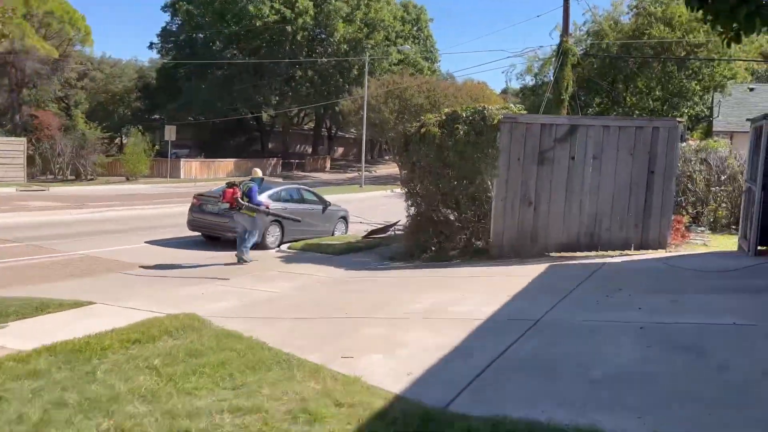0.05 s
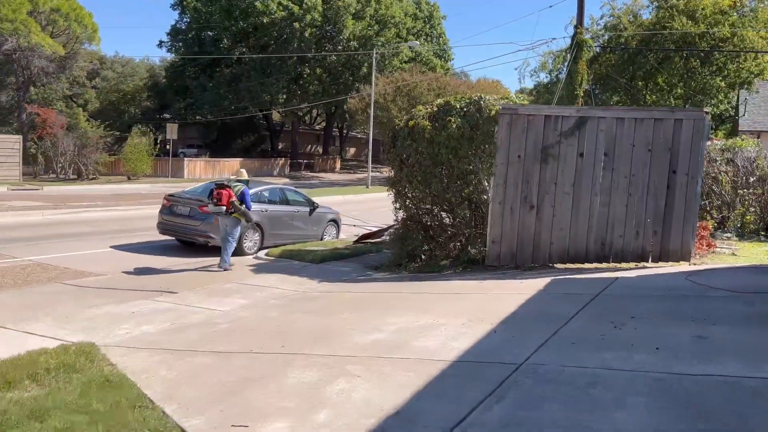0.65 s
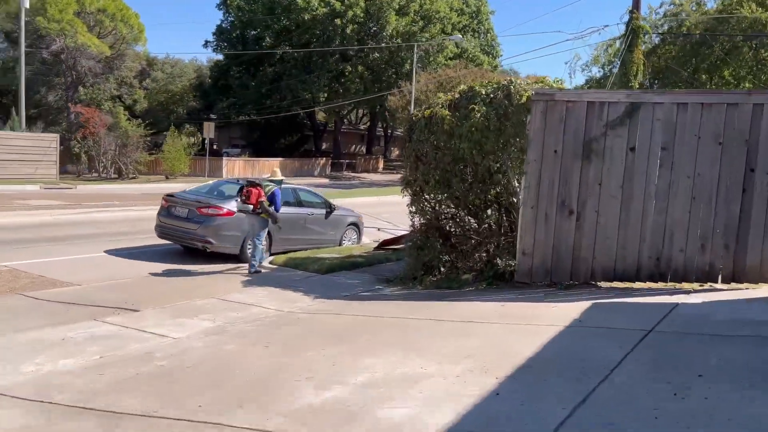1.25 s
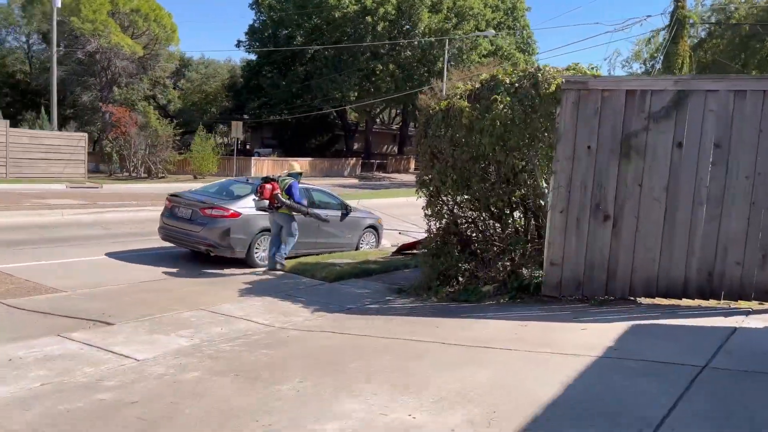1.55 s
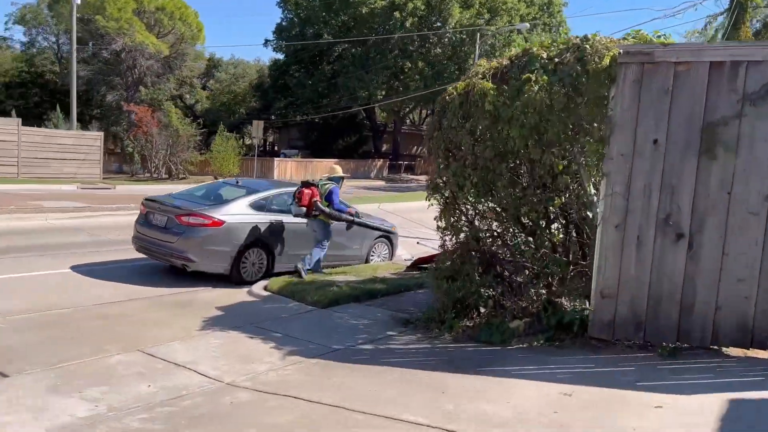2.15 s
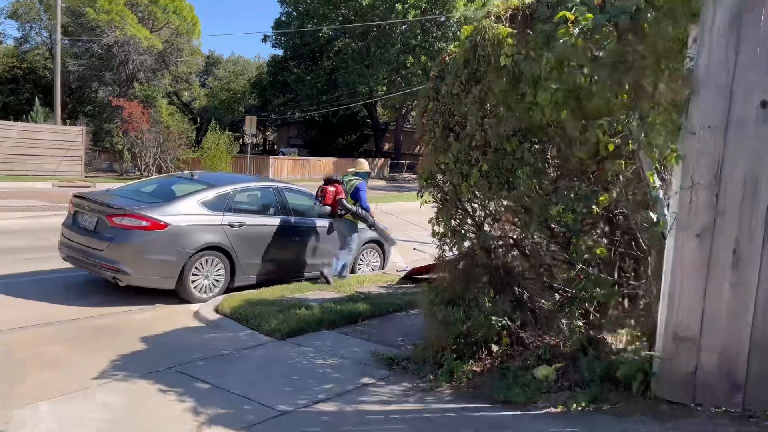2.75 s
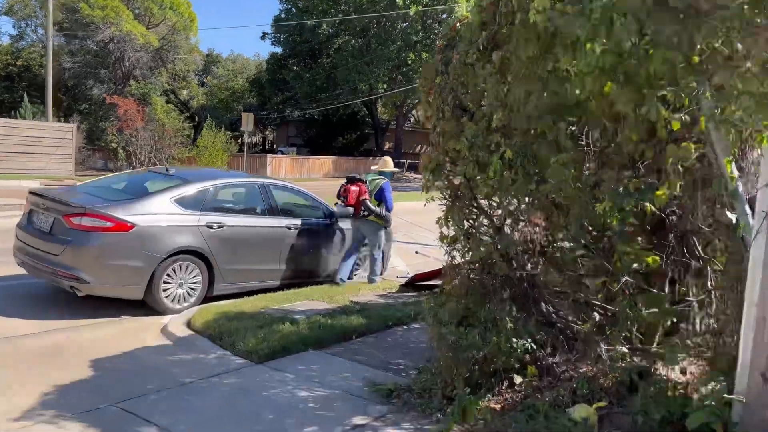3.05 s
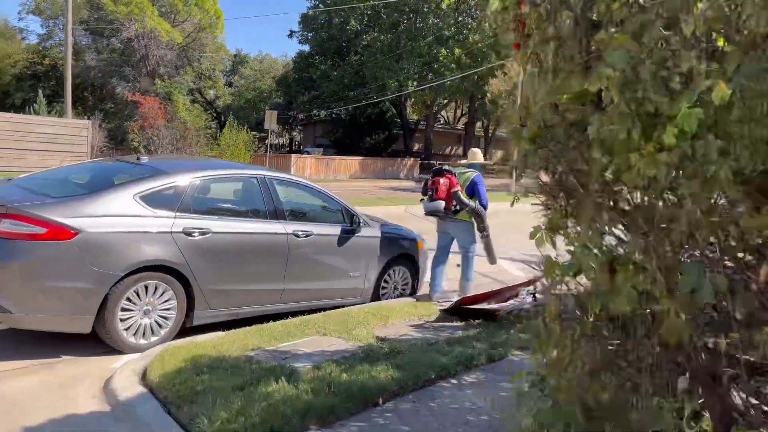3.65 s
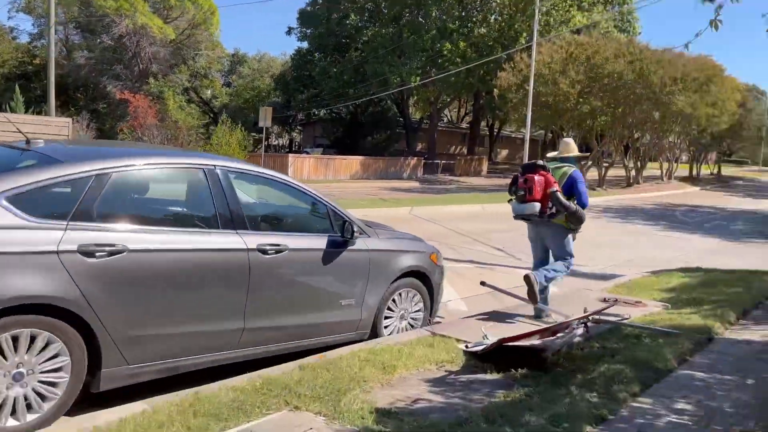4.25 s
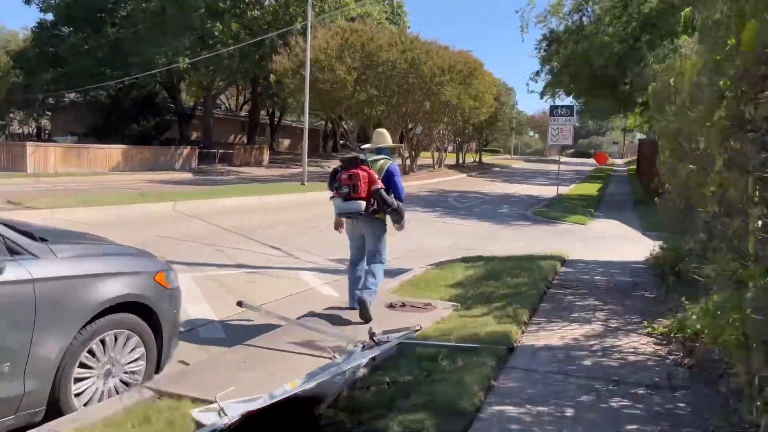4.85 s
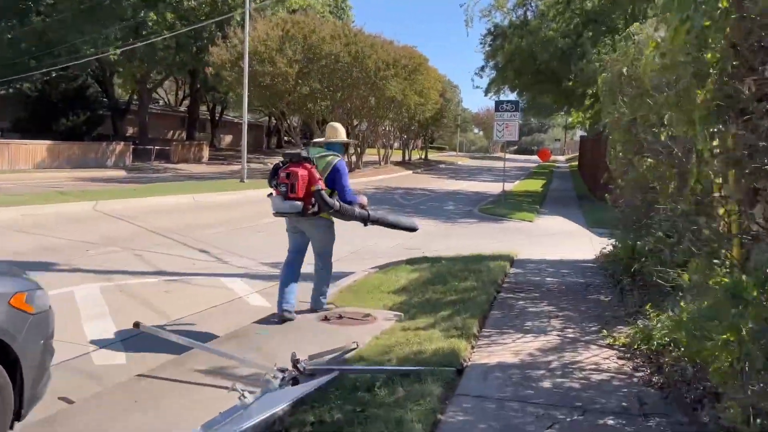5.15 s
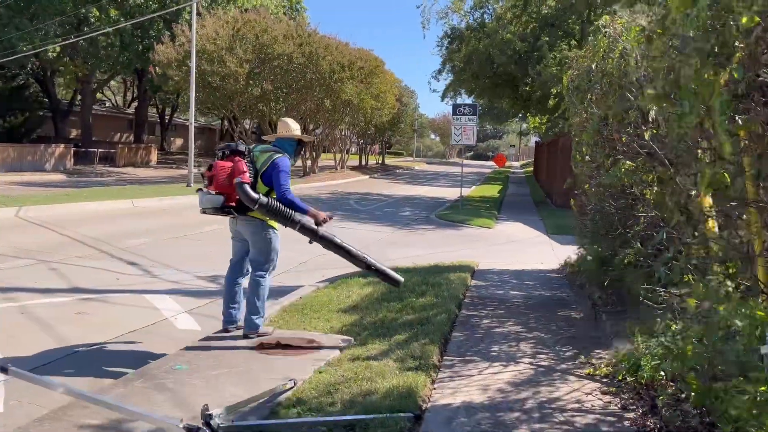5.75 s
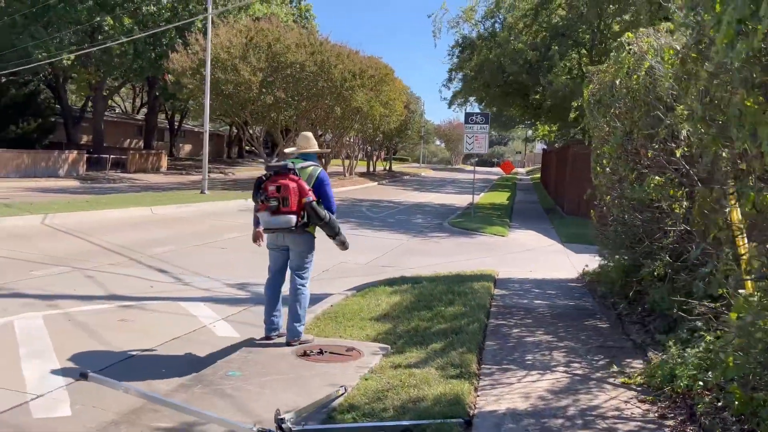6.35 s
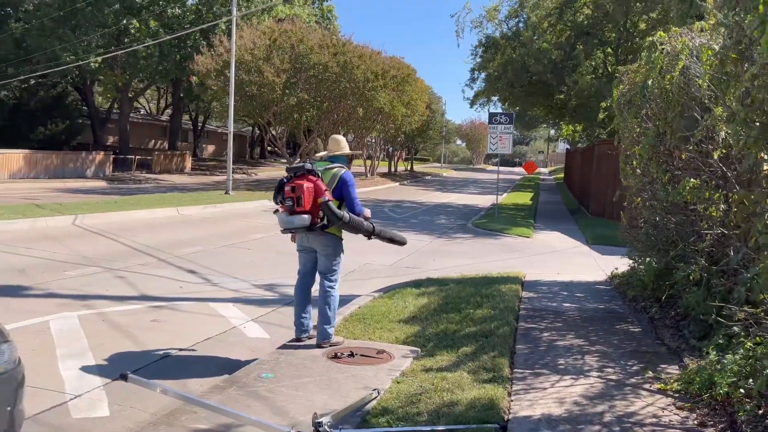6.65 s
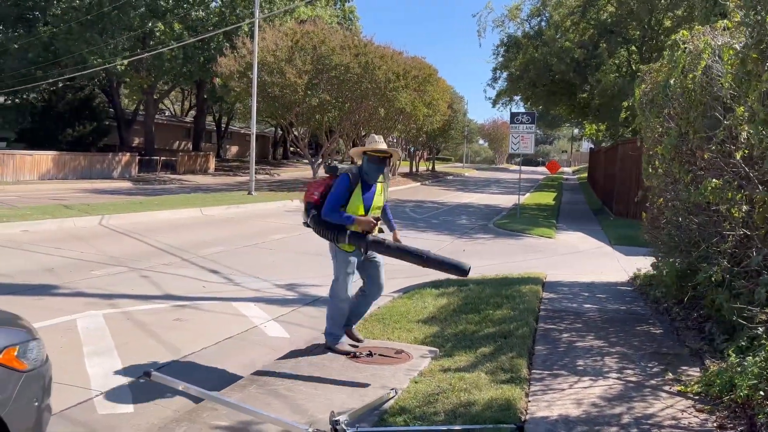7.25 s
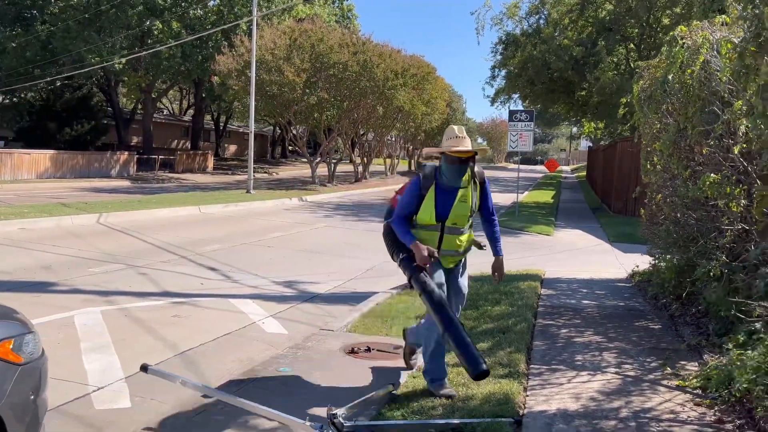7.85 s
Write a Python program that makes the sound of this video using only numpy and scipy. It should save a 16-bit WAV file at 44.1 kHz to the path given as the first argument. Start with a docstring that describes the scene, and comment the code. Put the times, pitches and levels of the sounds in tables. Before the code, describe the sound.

A two-stroke leaf blower runs flat out with a buzzing whine and rushing air, then coasts down while another engine revs farther off.

```python
"""Leaf blower beside a street

A two-stroke backpack leaf blower runs flat out while the microphone walks up to it. Its exhaust
drones, its fan whines and its air jet hisses over the pavement; at 7 s the throttle is let go and
it coasts down. A second machine further off idles, then revs up once and drops back.
The street rumbles underneath, and distant motors hum at the start."""
import sys
import numpy as np
from scipy import signal
from scipy.fft import rfft, irfft, next_fast_len
from scipy.io import wavfile
from scipy.ndimage import uniform_filter1d, map_coordinates

SR = 44100
rng = np.random.default_rng(int(sys.argv[2]) if len(sys.argv) > 2 else 0)


def pcm_store(signal):
    """Save signal as 16-bit PCM."""
    levels = np.round(np.clip(np.atleast_2d(signal), -1, 1) * 32767)
    wavfile.write(sys.argv[1], SR, levels.astype(np.int16).T)


N = 348390
TIME = np.arange(N) / SR


def amp(db):
    """Turn decibels into a gain."""
    return 10 ** (np.asarray(db) / 20)


def unit(x):
    """Scale a signal to an average (rms) level of 1."""
    return x / np.sqrt(np.mean(x ** 2) + 1e-20)


def since(start_s):
    """Seconds gone by since the start, zero before it."""
    return np.maximum(TIME - start_s, 0)


def bell(x, centre, width):
    """A smooth hump that reaches 1 at its centre."""
    return np.exp(-((x - centre) / width) ** 2)


def along(points, hz):
    """Read between (frequency, value) points on a musical (log) scale."""
    point_hz, values = np.transpose(points)
    return np.interp(np.log(hz + 1), np.log(point_hz + 1), values)


def curves(rows):
    """Join a table's rows with straight lines: one curve for each column after the time."""
    times, *columns = np.transpose(rows)
    return [np.interp(TIME, times, column) for column in columns]


def wobble(rate):
    """A smooth random curve through `rate` new values a second."""
    coarse = np.arange(0, N + 64, 64)
    knots = rng.standard_normal(4096)
    return np.interp(np.arange(N), coarse, map_coordinates(knots, [coarse * rate / SR], mode="wrap"))


def filtered(x, response):
    """Multiply each frequency in x by response(hz)."""
    size = next_fast_len(N + SR // 4)
    return irfft(rfft(x, size) * response(np.fft.rfftfreq(size, 1 / SR)), size)[..., :N]


def lows(x, split_hz):
    """Keep the part of x below split_hz."""
    return filtered(x, lambda hz: 1 / (1 + (hz / split_hz) ** 6))


def rush(spectrum, patchy_db, frames=40):
    """Swirling air, direct and scattered: noise with loud and soft patches, each `frames` long."""
    noise = signal.stft(rng.standard_normal((2, N)), nperseg=512)[2]
    patches = uniform_filter1d(rng.standard_normal(noise.shape[1:]), size=6, axis=0)
    patches = uniform_filter1d(patches, size=frames, axis=1)
    pair = signal.istft(noise * amp(patchy_db * unit(patches)), nperseg=512)[1][:, :N]
    return unit(filtered(pair, lambda hz: amp(along(spectrum, hz))))


def shaft(hz, jitter):
    """The angle of a turning shaft: no two firings push quite alike."""
    return 2 * np.pi * np.cumsum(hz * (1 + jitter * wobble(70))) / SR


def tone(angle, scatter, rate, spread=1, in_step=False):
    """A tone, direct and scattered, that shimmers as reflections shift."""
    # tones in step peak near each firing, so together they buzz
    offset = rng.normal(0, 1.1) if in_step else rng.uniform(0, 2 * np.pi)
    angle = (angle % (2 * np.pi) + offset).astype(np.float32)
    cos, sin = np.cos(angle), np.sin(angle)
    a, b = wobble(rate), wobble(rate)
    direct = (np.sqrt(2) * cos + scatter * (a * cos + b * sin)) / np.sqrt(1 + scatter ** 2)
    return np.array([direct, spread * (b * cos - a * sin)])


# Far-off hums: (pitch [Hz], level [dB], middle of the fade-out [s])
MOTOR_HUMS = [(223.6, -59.5, 4.16), (319, -62, 1.98), (400, -52, 0.83), (531, -58, 1.06), (591, -50, 0.66),
              (696.5, -49.5, 0.94)]


def distant_motors():
    """Each motor hums one wavering note, then fades away."""
    hum = 0
    for hz, db, fade_s in MOTOR_HUMS:
        fade = np.clip((fade_s - TIME) / 0.49 + .5, 0, 1)
        angle = shaft(hz * (1 + 0.00457 * wobble(5.45)), jitter=0.0071)
        hum += amp(db) * fade * tone(angle, scatter=1.0, rate=18)
    return hum


# Tone colour of the street: (frequency [Hz], relative level [dB])
RUMBLE_COLOUR = [(25, -34), (45, -57), (70, -16.5), (105, -1.5), (160, 0.5), (230, 1), (330, -2.5),
                 (480, -3.5), (650, -9), (1000, -5), (2000, -89)]
# How it rises and falls: (time [s], relative bass level [dB], relative low-mid level [dB])
RUMBLE_LEVELS = [(0.0, -54, -56), (0.63, -58, -56), (0.81, -50.5, -51.5), (1.08, -62, -56),
                 (1.38, -55.5, -53.5), (1.77, -70, -56), (1.89, -60, -56), (2.28, -65.5, -55),
                 (3.81, -65.5, -59.5), (4.05, -54.5, -58), (4.95, -68, -57.5), (5.28, -55.5, -58),
                 (5.58, -62, -61), (6.95, -71.5, -59.5)]


def street_rumble():
    """Low outdoor noise; faint footsteps thud in its deepest part now and then."""
    bass_db, low_mid_db = curves(RUMBLE_LEVELS)
    rumble = rush(RUMBLE_COLOUR, patchy_db=2.5)
    bass = lows(rumble, split_hz=194)
    return amp(bass_db + 8.5 + 2.5 * wobble(8.3)) * bass + amp(low_mid_db + 5.5) * (rumble - bass)


# Both machines share an idle speed, a note at which the fan housing rings, and ragged firing off load.
IDLE_HZ, COAST_S = 107.7, .225
HOUSING_HZ, HOUSING_WIDTH_HZ = 2170, 270
MISFIRE_DB = 2.2


def coast(hz, shut_s):
    """Shaft speed that runs down to idle once the throttle shuts."""
    return IDLE_HZ + (hz - IDLE_HZ) * np.exp(-since(shut_s) / COAST_S)


REV_OPEN_S, REV_SHUT_S, REV_RISE_S, REV_TOP_HZ = 7.09, 7.725, 0.23, 234.5


def rev_speed():
    """The second machine's speed: idle, a run-up that levels off, then coasting."""
    opened = 1 - np.exp(-(since(REV_OPEN_S) / REV_RISE_S) ** 1.4)
    return coast(IDLE_HZ + (REV_TOP_HZ - IDLE_HZ) * opened, REV_SHUT_S)


def second_exhaust(angle, hz, load):
    """The pipe booms and the muffler rings as the rising tones pass through their natural notes."""
    boom = amp(6.4 * load * bell(hz, 169.4, 8.9))
    low_ring = amp(-5 + 5.8 * load * bell(2 * hz, 350, 70))
    high_ring = amp(-5.5) * bell(3 * hz, 560, 30)
    return (boom * tone(angle, scatter=0.53, rate=34, spread=0.23)
            + low_ring * tone(2 * angle, scatter=0.35, rate=13, spread=0.59)
            + high_ring * tone(3 * angle, scatter=0.33, rate=11, spread=0.45))


# The second machine's buzz: (multiple of the shaft speed, relative level [dB])
SECOND_BUZZ = [(3, -6), (4, -2), (5, -1), (6, -9), (7, 0), (8, -9), (9, -10), (10, -8), (11, -10)]
# Tone colour of its sputter: (frequency [Hz], relative level [dB])
SPUTTER_COLOUR = [(40, -70), (90, -31), (140, 4), (210, 1), (300, -9), (400, -12), (560, -7), (900, -11),
                  (1500, -35), (4000, -80)]


def second_machine():
    """Another two-stroke idles, opens up for about half a second and falls back sputtering."""
    hz = rev_speed()
    speed_db = 20 * np.log10(hz / REV_TOP_HZ)
    unloaded = 1 - np.exp(-since(REV_SHUT_S) / .06)
    load = np.clip(since(REV_OPEN_S) / .08, 0, 1) * (1 - unloaded)
    ragged_db = (2 + MISFIRE_DB * unloaded) * wobble(45)
    angle = shaft(hz, jitter=0.0045 + 0.0208 * unloaded)
    exhaust_db = -43.5 + 1.36 * speed_db - 21 * (1 - load) + ragged_db
    exhaust = amp(exhaust_db) * second_exhaust(angle, hz, load)
    buzz = sum(amp(db) * tone(k * angle, scatter=.7, rate=20) for k, db in SECOND_BUZZ)
    # the fan's whine flares where its housing rings
    flare = (TIME <= REV_SHUT_S) * bell(12 * hz, 2715, 80)
    flare += 0.5 * unloaded * bell(12 * hz, HOUSING_HZ, HOUSING_WIDTH_HZ)
    whine_db = -60.5 + speed_db + 9 * flare - 3 * unloaded + 2.1 * wobble(45)
    whine = amp(whine_db) * tone(12 * angle, scatter=0.57, rate=35, spread=0.9)
    whine *= np.clip(since(REV_OPEN_S) / REV_RISE_S, 0, 1)
    puffs = np.exp(0.97 * np.cos(angle)) * amp(MISFIRE_DB * wobble(50)) * rng.standard_normal((2, N))
    sputter = amp(-51) * unloaded * unit(filtered(puffs, lambda hz: amp(along(SPUTTER_COLOUR, hz))))
    buzz_db = -54 + 5 * speed_db - 3 * unloaded + 1.25 * wobble(30)
    return exhaust + amp(buzz_db) * buzz + whine + sputter


# The echo off the pavement comes later as the microphone nears: (time [s], delay [ms])
ECHO_DELAY = [(0.0, 0.39), (1.0, 0.35), (1.7, 0.44), (2.3, 0.55), (2.9, 0.61), (4.2, 0.71), (5.0, 0.81),
              (5.7, 0.88), (7.0, 0.88)]


def pavement(x, share):
    """The ground's echo cuts hollows into the air noise, and they slide down in pitch."""
    delay_ms, = curves(ECHO_DELAY)
    echo = np.array([np.interp(TIME - delay_ms / 1000, TIME, row) for row in x])
    return (x + share * echo) / np.sqrt(1 + share ** 2)


# Tone colours of the jet and of its hollow puff: (frequency [Hz], relative level [dB])
JET_COLOUR = [(300, -32), (600, -20.5), (850, -4), (1100, 6), (1350, 1), (1700, -11), (3000, -26)]
PUFF_COLOUR = [(550, -25), (950, 0), (1500, -22), (4000, -60)]


def ground_jet(gain, sweep):
    """The air jet hits the ground, and puffs as the nozzle sweeps over it."""
    gust = pavement(rush(JET_COLOUR, patchy_db=1.3, frames=20), share=0.19)
    lower = lows(gust, split_hz=1300)
    tilt_db = -1.8 + 0.19 * TIME  # the ground's echo brightens the jet as the microphone nears
    jet = amp(tilt_db) * (gust - lower) + amp(-tilt_db) * lower
    return gain * jet + amp(-46) * sweep * rush(PUFF_COLOUR, patchy_db=5)


# The air's middle range at full throttle: (time [s], relative jet level [dB], relative roar level [dB])
AIR_MID_LEVELS = [(0.0, -51, -47), (0.45, -46.5, -41.5), (0.6, -48.5, -45.5), (1.14, -48.5, -45.5),
                  (1.26, -54, -45.4), (1.5, -49, -45.5), (1.68, -51, -45.5), (2.04, -46, -45),
                  (2.37, -57, -43.5), (2.7, -48, -44), (2.94, -50.5, -44), (3.21, -55, -45.5),
                  (4.05, -49.5, -46), (4.32, -54, -44), (4.98, -45, -45.5), (5.25, -46.5, -44.5),
                  (5.4, -46, -42.5), (6.42, -45.5, -45), (6.78, -48, -48), (6.95, -44.5, -45.5)]
# Its treble: (time [s], relative hiss level [dB], relative fizz level [dB])
AIR_TREBLE_LEVELS = [(0.0, -44, -50), (0.5, -44.5, -49.5), (0.8, -43, -53.5), (1.8, -45, -48.5),
                     (2.1, -45, -51), (2.8, -43, -49.5), (3.4, -48, -55), (3.7, -44, -51),
                     (3.8, -44.5, -58), (5.1, -47.5, -52.5), (5.5, -43.5, -50), (5.95, -44, -48.5),
                     (6.15, -43.5, -55), (6.4, -52, -53.5), (6.95, -46.5, -53)]
# A faster fan is louder. Rows are jet, roar, hiss, fizz:
# (exponent of the blower's speed, second machine's relative level at top speed [dB])
AIR_GROWTH = [(1.3, -55.5), (2.6, -48.5), (4.3, -55), (5.5, -62.5)]
# Tone colours of fan roar, nozzle hiss and the highest fizz: (frequency [Hz], relative level [dB])
ROAR_COLOUR = [(800, -29), (1200, -7), (1600, 4.5), (2000, 2.5), (2300, 1.5), (2650, 0.5), (3000, 3),
               (3500, -0.5), (4300, -5.5), (7000, -23)]
HISS_COLOUR = [(2400, -33), (3400, -2), (3900, 1.5), (4400, 2), (5200, 4), (6000, 4), (6800, 0.5),
               (7700, -2.5), (8200, -5.5), (8900, -11.5), (12000, -7)]
FIZZ_COLOUR = [(6500, -20), (7800, 0), (8250, 9), (8800, 0), (9300, -0.5), (10000, 2), (10700, 7),
               (11600, 1.5), (13000, -6), (15000, -2), (16000, -8)]


def rushing_air(angle, hz):
    """Air roars in the fan and hisses at the nozzle; the second machine's air joins in as it revs."""
    rev = (rev_speed() / REV_TOP_HZ) ** 1.75
    levels = curves(AIR_MID_LEVELS) + curves(AIR_TREBLE_LEVELS)
    jet_gain, roar_gain, hiss_gain, fizz_gain = [
        np.hypot(amp(db) * (hz / hz[0]) ** power, amp(rev_db) * rev)
        for db, (power, rev_db) in zip(levels, AIR_GROWTH)]
    sweep = bell(TIME, 7.07, .09)  # the nozzle swings as the throttle shuts
    jet = ground_jet(jet_gain, sweep)
    roar = roar_gain * pavement(rush(ROAR_COLOUR, patchy_db=1.2, frames=16), share=0.43)
    hiss = hiss_gain * pavement(rush(HISS_COLOUR, patchy_db=1.6, frames=16), share=0.3)
    hiss *= amp(1.5 * sweep)
    fizz = fizz_gain * amp(0.33 * wobble(21)) * rush(FIZZ_COLOUR, patchy_db=3.6, frames=14)
    middle = throb(angle, depth=0.12) * (amp(-2) * jet + amp(-0.67) * roar)
    treble = throb(angle, depth=0.069) * amp(-1) * (hiss + fizz)
    return middle + treble


def throb(angle, depth):
    """Every firing gives the air a small push."""
    return unit(np.exp(depth * (1 + .5 * wobble(60)) * np.cos(angle)))


def sizzle(angle, smear_s):
    """One sharp click a turn, smeared by the housing, carries the buzz into the highest treble."""
    turns = np.arange(1, angle[-1] // (2 * np.pi))
    firings = np.interp(turns * 2 * np.pi, angle, np.arange(N))[:, None]
    taps = np.floor(firings) + np.arange(-7, 9)
    shapes = np.sinc(taps - firings)  # lets a click fall between two samples
    clicks = np.bincount(np.clip(taps, 0, N - 1).astype(int).ravel(), shapes.ravel(), N)
    _, fizz_db = curves(AIR_TREBLE_LEVELS)
    gain = amp(fizz_db - 6 + 2.2 * wobble(12))
    t = TIME[:SR // 20]
    housing = rng.standard_normal((2, len(t))) * np.exp(-t / smear_s)
    smeared = signal.oaconvolve(clicks[None], housing, axes=1)[:, :N]
    return gain * unit(filtered(smeared, lambda hz: amp(along(FIZZ_COLOUR, hz))))


def throttle_squeal(angle, shut_s):
    """A brief squeal and a thin whistle as the throttle closes."""
    squeal = amp(-48.5) * tone(9 * angle, scatter=0.94, rate=45, spread=0.64)
    whistle = amp(-49) * tone(shaft(hz=5850, jitter=0.00425), scatter=0.5, rate=90)
    return bell(TIME, shut_s, 0.028) * (squeal + whistle)


# The fan's whine at full throttle: (time [s], level [dB])
WHINE_LEVEL = [(0.0, -58.0), (0.14, -58), (0.2, -44.0), (0.32, -54.5), (0.34, -41.5), (0.48, -42.0),
               (0.94, -52.0), (1.0, -38.0), (1.12, -54.5), (1.18, -39.0), (1.24, -54.5), (1.26, -39.0),
               (1.42, -54.5), (1.46, -41.5), (1.52, -54.5), (1.58, -43.5), (1.9, -54.5), (2.02, -46.5),
               (2.14, -54.5), (2.18, -42.0), (2.3, -53.0), (2.46, -42.5), (2.82, -53.5), (2.9, -40.0),
               (3.2, -47.5), (3.32, -49.5), (3.72, -43.0), (3.8, -54.5), (3.86, -44.0), (4.22, -42.5),
               (4.28, -54.5), (4.66, -49.0), (4.74, -58), (5.12, -58.0), (5.16, -46.0), (5.24, -54.5),
               (5.34, -42.5), (5.52, -54.0), (5.72, -47.0), (5.8, -49.5), (6.1, -47.5), (6.14, -54.5),
               (6.44, -49.5), (6.64, -54.5), (6.72, -44.0), (6.78, -54.5), (6.84, -44.0), (6.97, -51.0)]


def fan_whine(angle, hz, shut):
    """Twelve blades whine. Off load the whine drops, except where it makes the housing ring."""
    whine_db, = curves(WHINE_LEVEL)
    coasting_db = shut * (-21 + 22 * bell(12 * hz, HOUSING_HZ, HOUSING_WIDTH_HZ))
    flutter_db = 2.3 * wobble(36)  # gusts at the intake
    blades = tone(12 * angle, scatter=0.25, rate=27, spread=0.33, in_step=True)
    return amp(whine_db + coasting_db + flutter_db) * blades


# Overtones of the casing and fan housing: (multiple of the shaft speed, base level [dB])
CASING_OVERTONES = [(8, -59), (9, -54), (10, -55), (11, -56.5), (13, -55.3), (14, -61.5), (15, -61.5),
                    (16, -56.5), (18, -66), (19, -68), (21, -55.5), (22, -63), (23, -62), (24, -58.5),
                    (25, -63), (26, -67.5), (28, -62), (29, -60), (30, -66), (31, -62.5), (32, -62),
                    (33, -62.5), (34, -62)]
# How they swell: (time [s], boost near 2 kHz [dB], near 4 kHz [dB], above 5 kHz [dB])
CASING_SWELLS = [(0.0, 1, 0, -5), (0.5, -0.5, 0.5, 3), (1.05, -3.5, -4.5, 4.5), (1.8, 4.5, 1, -2.5),
                 (2.2, 0.5, 3, 0), (2.75, 1, 3.5, 1.5), (3.0, -4.5, -2, 2), (3.45, -2, -1.5, -3),
                 (4.0, -2.5, -7, 2), (4.4, -9, -4, -1), (5.1, -3.5, -2.5, -1.5), (5.5, 5.5, 5.5, 0.5),
                 (6.05, -0.5, 4, 3.5), (6.55, -7, -10, -7.5), (6.95, 1, -2, -1)]


def casing_buzz(angle):
    """The casing shakes in step with the engine, making a row of evenly spaced overtones."""
    def band(first, last):
        return sum(amp(db) * tone(k * angle, scatter=0.42, rate=14, spread=0.72, in_step=True)
                   for k, db in CASING_OVERTONES if first <= k <= last)

    low_db, middle_db, high_db = curves(CASING_SWELLS)
    buzz = amp(low_db) * band(8, 10) + amp(middle_db) * band(13, 20) + amp(high_db) * band(21, 34)
    # the overtone just below the fan's whine swells with it
    whine_db, = curves(WHINE_LEVEL)
    return buzz + amp(0.3 * (whine_db - whine_db.mean())) * band(11, 11)


# Exhaust tones at full throttle; tone 2 is at twice the shaft speed, and so on.
# The drone swells and fades on the walk past fence and car: (time [s], tone 1 [dB], tone 2 [dB])
DRONE_LEVELS = [(0.0, -29.5, -35.5), (0.3, -29, -31.5), (1.23, -33.5, -34), (1.55, -36.5, -41),
                (1.76, -46.5, -36), (2.05, -38, -36.5), (2.11, -36.5, -43), (2.17, -35, -58),
                (2.23, -35, -41), (2.32, -32.4, -37), (2.72, -37, -45), (2.8, -38, -43), (2.96, -35.4, -49),
                (3.12, -33, -44), (3.28, -32, -55.5), (3.44, -32.5, -39.5), (3.65, -37, -42.5),
                (4.75, -32.6, -49.5), (5.47, -32.5, -47), (5.65, -34.5, -42), (6.36, -33, -45),
                (6.95, -37, -46)]
# The muffler's lower overtones: (time [s], tone 3 [dB], tone 4 [dB])
MUFFLER_LOW_LEVELS = [(0.0, -50, -64), (0.3, -56, -49.5), (0.9, -60, -56), (1.05, -68, -48),
                      (1.23, -54, -67), (1.44, -73, -46.5), (1.53, -56, -50), (2.13, -60.5, -52.5),
                      (2.25, -57, -63), (2.7, -52, -48.5), (3.21, -51.5, -62), (3.6, -63, -50),
                      (3.87, -56.5, -47.5), (4.11, -64, -49), (4.59, -52, -45.5), (5.1, -59.5, -45),
                      (5.25, -55, -41), (5.55, -61.5, -51.5), (5.73, -61, -48.5), (6.48, -56.5, -42),
                      (6.75, -58, -47), (6.95, -58, -51)]
# Its next overtones: (time [s], tone 5 [dB], tone 6 [dB])
MUFFLER_NEXT_LEVELS = [(0.0, -56, -59), (0.45, -48, -57), (0.95, -55.5, -65), (1.3, -57.5, -61),
                       (1.85, -60, -75), (2.2, -52, -64), (2.55, -58, -64), (2.95, -57, -47.5),
                       (3.35, -55, -51.5), (3.65, -54, -59), (4.05, -49, -52), (4.55, -54, -65),
                       (5.1, -46, -62), (5.3, -45, -56), (5.6, -58, -48.5), (6.05, -43.5, -51.5),
                       (6.5, -50, -53.5), (6.95, -54, -55)]
# Its nasal edge: (time [s], tone 7 [dB])
NASAL_LEVEL = [(0.0, -57.0), (0.44, -50.0), (0.48, -63.5), (0.74, -62.0), (0.82, -45.0), (0.88, -56.0),
               (1.28, -46.5), (1.46, -59.5), (1.78, -46.0), (2.14, -49.0), (2.42, -45.5), (2.56, -56.0),
               (2.8, -42.5), (3.52, -48.0), (3.62, -65.0), (3.66, -53.0), (3.98, -58.0), (4.2, -44.0),
               (4.26, -54.5), (4.56, -46.5), (5.08, -65.0), (5.12, -56.5), (5.6, -65.0), (5.8, -52.5),
               (6.12, -61.5), (6.18, -50.5), (6.64, -63.0), (6.96, -56.5)]


def exhaust_drone(angle):
    """One exhaust pulse a turn passes through the muffler, making a low note and its overtones."""
    db1, db2 = curves(DRONE_LEVELS)
    db3, db4 = curves(MUFFLER_LOW_LEVELS)
    db5, db6 = curves(MUFFLER_NEXT_LEVELS)
    db7, = curves(NASAL_LEVEL)
    return (amp(db1) * tone(angle, scatter=0.0069, rate=1.69, spread=0.17)
            + amp(db2) * tone(2 * angle, scatter=0.14, rate=13, spread=0.18)
            + amp(db3) * tone(3 * angle, scatter=0.42, rate=14, spread=0.51, in_step=True)
            + amp(db4) * tone(4 * angle, scatter=0.27, rate=18, spread=0.33, in_step=True)
            + amp(db5) * tone(5 * angle, scatter=0.4, rate=13, spread=0.55, in_step=True)
            + amp(db6) * tone(6 * angle, scatter=0.4, rate=13, spread=0.55, in_step=True)
            + amp(db7) * tone(7 * angle, scatter=0.22, rate=18, spread=0.45, in_step=True))


RELEASE_S, UNLOAD_S, UNLOADED_DB = 7.0, 0.03, -11
# The blower at full throttle: (time [s], shaft speed [Hz])
BLOWER_SPEED = [(0.0, 242), (0.68, 242.2), (0.8, 242.4), (0.94, 241.7), (1.28, 242.7), (1.46, 241.5),
                (1.7, 244.3), (1.78, 241.4), (2.2, 243.2), (2.76, 241.5), (2.84, 244.3), (3.08, 241.6),
                (3.2, 243), (3.62, 242.3), (4.1, 244.3), (4.22, 240.7), (4.34, 242.2), (4.42, 241.5),
                (4.84, 242.5), (4.98, 241.5), (5.22, 244.8), (5.26, 241.9), (5.78, 244.3), (5.86, 242.7),
                (6.44, 241.8), (6.62, 243.8), (6.74, 241.8), (6.96, 242.7)]


def leaf_blower():
    """One shaft drives engine and fan. With the throttle shut, it loses its load and coasts down."""
    hz = coast(curves(BLOWER_SPEED)[0], RELEASE_S)
    angle = shaft(hz, jitter=0.0008)
    shut = np.clip(since(RELEASE_S) / UNLOAD_S, 0, 1)
    load = amp(shut * (UNLOADED_DB + MISFIRE_DB * wobble(45))) * (hz / hz[0]) ** 2
    exhaust = exhaust_drone(angle)
    whine = fan_whine(angle, hz, shut)
    buzz = casing_buzz(angle) + sizzle(angle, smear_s=0.0056)
    return load * (exhaust + buzz) + whine + throttle_squeal(angle, RELEASE_S) + rushing_air(angle, hz)


# How the microphone's body colours the sound at its two openings:
# (frequency [Hz], left gain [dB], right gain [dB], left phase lead [rad], scattered sound gain [dB])
MIC_COLOUR = [(70, -1, 0.3, 0.01, -0.5), (239, 0.2, -0.6, -0.05, -8.0), (484, 0.7, -1.4, -0.55, -0.5),
              (750, 2.2, 2.6, 0.18, -6), (1100, 0, -0.25, -0.22, -4), (2200, 2.1, -1.4, 0.15, -7),
              (2870, 2, -2.5, 0.19, -4), (4200, 1.0, -0.2, -0.47, -11.5), (6100, 0.6, 0.5, -0.46, -8),
              (8160, 3.5, 2.5, -0.05, -8.5), (8800, 4, 0.5, 1.8, -4), (10200, 4.5, -6.5, -1.7, -2),
              (11800, 0.5, -3, 0.2, -2), (13500, -1, -4.5, -2, -4.5), (15200, -3, -10, -2.87, -12)]
# The worker's direction: (time [s], head start of the left side [microseconds])
LEFT_LEAD = [(0.0, 64), (0.4, 68), (3.5, 21), (4.2, -21), (4.7, 34), (4.9, 39), (5.7, 76), (6.1, 65),
             (6.5, 39), (7.3, 50), (7.5, -20), (7.85, -14)]


def microphone_pair(direct, scattered):
    """Each side colours the sound in its own way; the side nearer the worker hears it first."""
    mic_hz, left_db, right_db, phase, scattered_db = np.transpose(MIC_COLOUR)
    at = lambda values, hz: along(np.transpose([mic_hz, values]), hz)
    side = filtered(scattered, lambda hz: amp(at(scattered_db, hz)))
    left = filtered(direct + side, lambda hz: amp(at(left_db, hz)) * np.exp(.5j * at(phase, hz)))
    right = filtered(direct - side, lambda hz: amp(at(right_db, hz)) * np.exp(-.5j * at(phase, hz)))
    shift = curves(LEFT_LEAD)[0] * 1e-6 * SR / 2
    samples = np.arange(N)
    return np.array([map_coordinates(left, [samples + shift], order=5),
                     map_coordinates(right, [samples - shift], order=5)])


def scene():
    """The blower close by and everything further off, heard in stereo."""
    direct, scattered = leaf_blower() + second_machine() + distant_motors() + street_rumble()
    return microphone_pair(direct, scattered)


def record(dry):
    """Cut off the very highest treble."""
    return filtered(dry, lambda hz: hz < 15750)


dry = scene()
out = record(dry)
pcm_store(out)
```